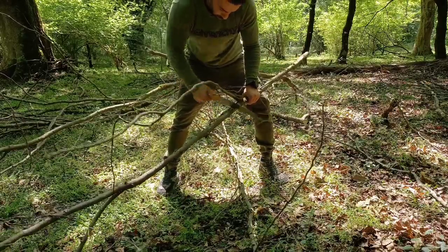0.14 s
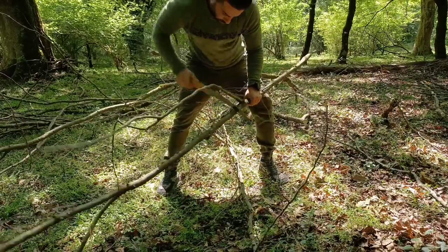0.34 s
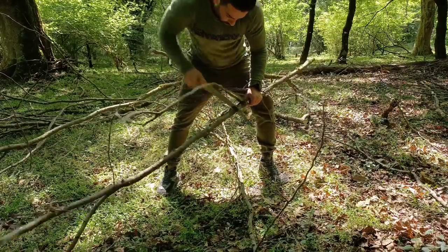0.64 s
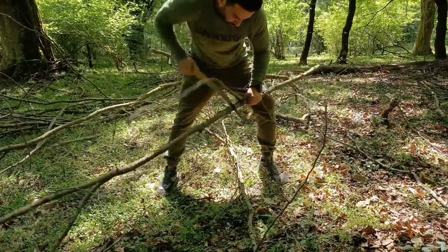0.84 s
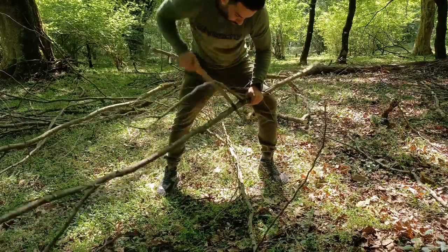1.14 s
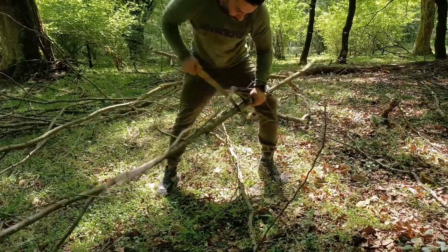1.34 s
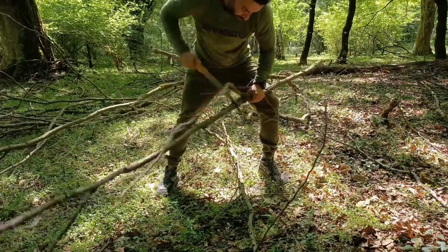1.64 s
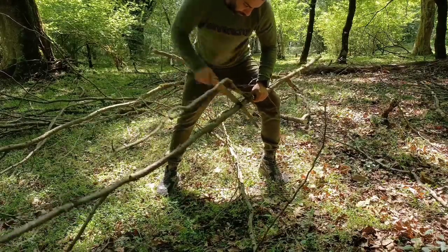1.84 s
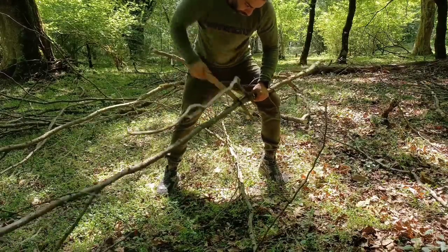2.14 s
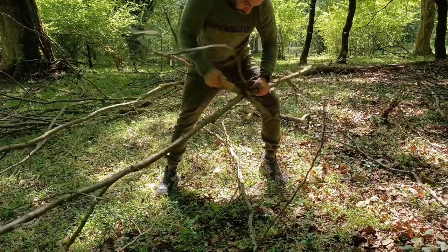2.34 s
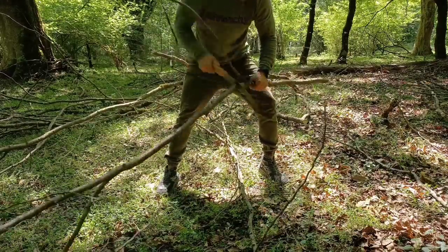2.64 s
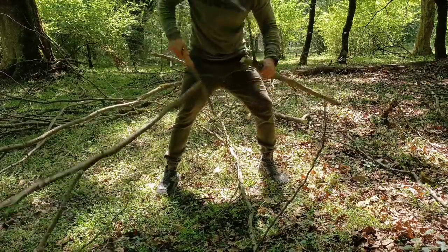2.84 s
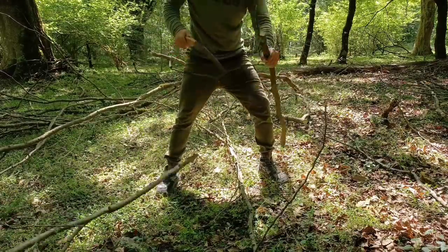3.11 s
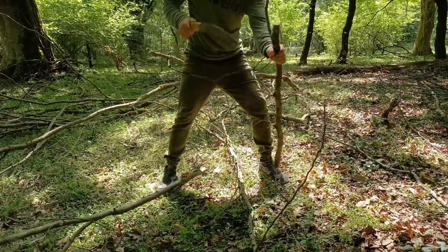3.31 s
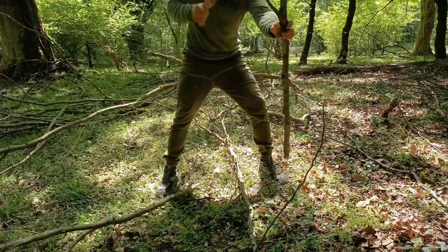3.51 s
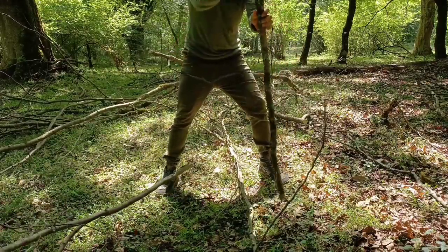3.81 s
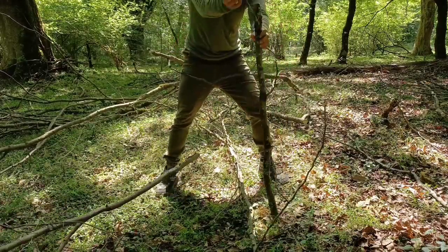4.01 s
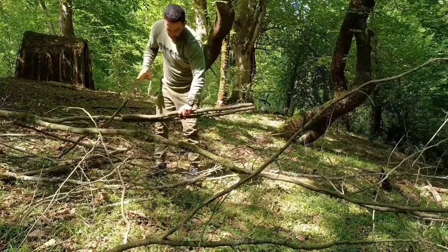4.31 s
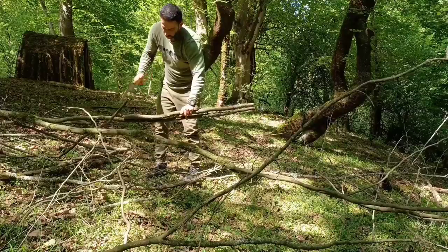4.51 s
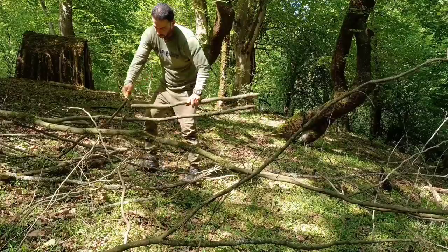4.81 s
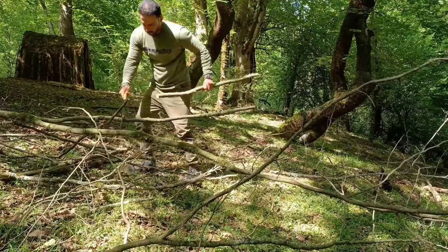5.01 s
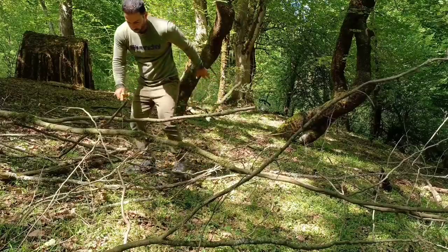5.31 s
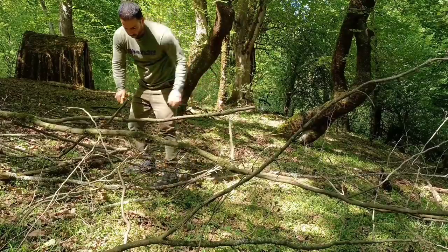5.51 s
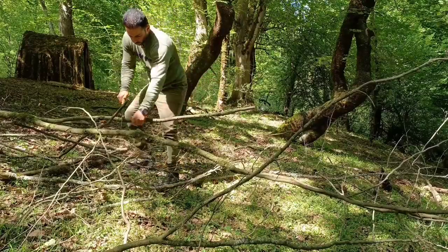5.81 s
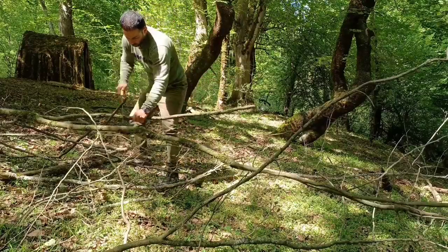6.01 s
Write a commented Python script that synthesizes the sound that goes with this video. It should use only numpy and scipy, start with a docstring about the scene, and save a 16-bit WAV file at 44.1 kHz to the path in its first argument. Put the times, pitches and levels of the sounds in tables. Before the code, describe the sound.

Rapid hand-saw rasps through dry wood, fibres splintering and leaf litter crackling, then knocks of dropped branches, a still pause, and one loud stick clatter.

```python
"""A man saws a dry branch on a forest floor: each stroke is a spray of fibre clicks that follows blade speed,
while twigs shake in dead leaves (clustered clicks), fibres snap (noise bursts) and soil thuds (resonant noise).
It cracks through; the branch is dragged and dropped, and sticks clack together (struck wood modes).
Small birds whistle far off (gliding sines), he steps through the litter and throws a stick on a pile.
Tree echoes (decaying noise) and still forest air (coloured noise) run throughout."""
import sys
import numpy as np
from scipy import signal
from scipy.fft import rfft, irfft
from scipy.io import wavfile
from scipy.ndimage import map_coordinates

SR = 44100
rng = np.random.default_rng(int(sys.argv[2]) if len(sys.argv) > 2 else 0)


def generate_wav(signal):
    """Clip the signal to [-1, 1] and save it as 16-bit WAV at the path in sys.argv[1]."""
    frames = np.transpose(np.atleast_2d(signal))
    scaled = np.clip(frames, -1, 1) * 32767
    pcm = np.round(scaled).astype(np.int16)
    wavfile.write(sys.argv[1], SR, pcm)


N = 271215
TIME_S = np.arange(N) / SR

# Event levels are relative between events of one table.
# saw strokes, pull and push in turn: (start [s], length [s], share of length at top speed [0-1], force [dB],
# ring of blade and wood [Hz], leaf shake re force [dB], branch judder re force [dB])
STROKES = [(0.019, 0.13, 0.72, -42.5, 1280, -5, -12), (0.158, 0.14, 0.57, -38, 2590, -13, -20),
           (0.34, 0.12, 0.34, -39.5, 2300, 2, -8.5), (0.459, 0.18, 0.32, -36.5, 2480, -2, -20.5),
           (0.604, 0.12, 0.38, -38.5, 3000, 0, -9.5), (0.737, 0.17, 0.23, -37, 2400, -2.5, -22),
           (0.892, 0.083, 0.64, -34.5, 1990, 2, -11), (1.003, 0.19, 0.29, -37, 3200, -2.5, -17.5),
           (1.121, 0.12, 0.74, -40, 1430, 4.5, -10), (1.278, 0.11, 0.44, -34, 3300, -3, -21),
           (1.428, 0.12, 0.29, -34.5, 2350, -1.5, -12), (1.547, 0.13, 0.25, -35.5, 3520, -6.5, -24),
           (1.699, 0.13, 0.34, -36, 4300, 0, -19), (1.829, 0.17, 0.27, -39, 1590, -2, -20.5),
           (1.969, 0.13, 0.34, -33.5, 2480, -2, -14.5), (2.09, 0.11, 0.41, -33.5, 3420, -11, -21.5),
           (2.253, 0.088, 0.69, -33, 4450, -0.5, -22.5), (2.386, 0.14, 0.29, -37.5, 1670, -7.5, -18)]
# steps and sweeps of a branch through leaves: (loudest [s], length [s], crackle [dB], crunch re crackle [dB])
RUSTLES = [(0.327, 0.084, -40, -4.5), (2.604, 0.08, -42.5, -5), (2.739, 0.061, -40.5, -1.5),
           (2.918, 0.11, -36.5, -6), (3.058, 0.092, -39, -6.5), (3.224, 0.15, -38.5, -7.5),
           (3.321, 0.059, -41.5, -10), (3.419, 0.034, -34.5, -13), (3.466, 0.056, -38, -10.5),
           (3.944, 0.06, -44, -8.5), (4.763, 0.13, -55.5, -34), (4.903, 0.065, -51, -9),
           (5.074, 0.059, -55, -9), (5.5, 0.065, -51.5, -1.5), (5.621, 0.14, -43.5, -4),
           (5.833, 0.12, -44.5, -12.5), (5.977, 0.11, -49.5, -2), (6.135, 0.06, -53, -2.5)]
# litter stirring under the sawn and dragged branch: (time [s], crackle [dB])
DRAGGING = [(0, -55.5), (.45, -53.5), (.65, -45.5), (1.2, -37.5), (2.1, -39.5), (2.37, -43.5),
            (2.67, -50.5), (3.15, -45.5), (3.68, -57.5), (3.87, -64), (4.02, -58), (4.2, -72.5), (4.3, -87)]
# litter stirring under his feet: (time [s], crackle [dB])
WALKING = [(4.56, -80), (4.61, -69), (4.98, -61), (5.2, -63), (5.38, -73), (5.45, -55.5), (6.15, -62)]
# twigs and wood fibres snapping: (time [s], level [dB], woody crack re treble [dB], ring [Hz])
SNAPS = [(0.5425, -30, 13.5, 3020), (0.602, -25.5, 7, 5250), (0.824, -16.5, -2, 6170),
         (0.885, -16, -2.5, 5700), (1.174, -11.5, -6.5, 5360), (1.5612, -24.5, 3.5, 3730),
         (1.576, -23, 6, 3900), (1.679, -23.5, 0.5, 2960), (1.724, -21, 0.5, 4270), (2.14, -30.5, 16, 3450),
         (2.166, -22, 8.5, 2920), (2.2005, -23.5, 0.5, 3800), (2.2429, -19, 0, 5600),
         (2.412, -23.5, 4, 4870), (2.4281, -17.5, 6.5, 2100), (2.442, -24, 7.5, 5500),
         (2.465, -18.5, -2.5, 5510), (2.485, -20, 9, 1600), (2.742, -23.5, 2, 3540),
         (2.8219, -32, 5.5, 4320), (2.923, -30, 5, 3000), (3.165, -23.5, -5, 4000),
         (3.222, -24.5, -2, 5300), (3.377, -35.5, 5.5, 4560), (3.747, -40, -4.5, 5300), (4.0, -38, 0, 2190),
         (5.545, -39, 4, 5000), (5.5915, -33, 10, 2250), (5.814, -40, 1, 6230)]
# feet and wood landing on soft soil: (time [s], level [dB], length [s], thud pitch [Hz])
THUDS = [(0.546, -44, 0.064, 240), (1.11, -44, 0.032, 235), (1.227, -43, 0.074, 222),
         (3.226, -39.5, 0.042, 158), (3.929, -53, 0.031, 177), (4.725, -57.5, 0.072, 367),
         (5.539, -53, 0.049, 260), (5.577, -41, 0.041, 400), (5.594, -38.5, 0.055, 203),
         (5.799, -53.5, 0.069, 234), (5.942, -54, 0.11, 694), (5.964, -59, 0.092, 138),
         (6.084, -60, 0.16, 268)]
# light sticks knocking: (time [s], level [dB], contact hardness as treble cutoff [Hz])
CLACKS = [(2.486, -22, 1800), (2.741, -22, 2000), (3.6195, -27, 2200), (3.6215, -18.5, 5530),
          (3.627, -37, 3500), (3.641, -35, 2500), (3.828, -39.5, 1300)]
# thick branches knocking: (time [s], level [dB], contact hardness as treble cutoff [Hz])
KNOCKS = [(2.919, -18, 2580), (3.121, -26.5, 1510), (3.169, -23.5, 1020), (5.448, -34, 1300),
          (5.5798, -12.5, 1700), (5.582, -12.5, 1400), (5.5885, -16.5, 1700), (5.604, -20, 600),
          (5.787, -30, 1780), (5.812, -27.5, 750), (6.14, -33, 1100)]
# brittle leaves breaking: (time [s], level [dB])
LEAF_BREAKS = [(3.0245, -21), (3.3255, -23.5), (3.41, -27), (3.465, -29), (3.904, -41), (3.934, -28.5),
               (4.381, -63.5), (4.606, -55.5), (4.805, -41), (4.8933, -37.5), (5.356, -58), (5.424, -48)]
# bird whistles: (start [s], length [s], first pitch [Hz], last pitch [Hz], level [dB])
WHISTLES = [(4.471, .045, 4600, 4190, -79.5), (4.506, 0.078, 4050, 3410, -72),
            (4.54, 0.11, 4500, 3950, -73.5), (4.568, 0.057, 3390, 3310, -64),
            (4.667, 0.13, 3250, 3490, -70), (5.124, .045, 3230, 3055, -61.5), (5.24, .035, 4300, 4100, -77),
            (5.293, 0.037, 3760, 3900, -72.5), (5.29, 0.11, 2340, 2270, -73)]

# modes of a light stick: (frequency [Hz], level [dB], t60 [s])
STICK_MODES = [(1050, -10.5, 0.098), (1204, -4, 0.14), (1360, -4, .09), (1560, -1.5, 0.1), (2010, 6, 0.081),
               (2220, 1.5, .055), (2440, -1, .09), (2830, 1, 0.08), (3300, -2, .07), (4660, -3.5, .05)]
# modes of a thick branch: (frequency [Hz], level [dB], t60 [s])
BRANCH_MODES = [(222, -6, 0.17), (383, -10, 0.057), (495, -4, 0.056), (672, -4, 0.13), (1004, 7, 0.064),
                (1194, -1, .06), (1315, 2, .11), (1450, 4.5, .06), (2250, -3, .06), (2640, 3, 0.083),
                (3440, 10, .04)]
# resonances of blade and wood under the teeth: (frequency [Hz], width [Hz], boost [dB])
CUT_RESONANCES = [(588, 135, 17), (1480, 300, 3), (2200, 67, 6), (5460, 300, 2.5)]

# spectrum of teeth on wood: (frequency [Hz], relative density [dB])
RASP_SPECTRUM = [(100, -38.5), (300, -18.5), (600, -19.5), (850, -7.5), (1300, -2.5), (2500, -0.5),
                 (3800, 1), (6000, 0.5), (8500, -7.5), (10500, -1), (12800, 5), (16000, -5.5)]
# spectrum of tough fibres catching: (frequency [Hz], relative density [dB])
CATCH_SPECTRUM = [(200, -6), (2500, -1), (16000, -12.5)]
# spectrum of the juddering branch: (frequency [Hz], relative density [dB])
JUDDER_SPECTRUM = [(25, -41), (60, -37.5), (110, -4.5), (160, -9), (225, 9), (300, 1), (500, 1), (900, -7),
                   (2500, -39.5)]
# spectrum of crisp leaves, also the treble of snaps: (frequency [Hz], relative density [dB])
CRACKLE_SPECTRUM = [(100, -69.5), (600, -24), (2000, -17.5), (3500, -3.5), (5200, 0.5), (7000, -2),
                    (8600, -5), (10500, 1), (12700, 6.5), (14500, 4.5), (16000, -2.5)]
# spectrum of stalks and moss: (frequency [Hz], relative density [dB])
CRUNCH_SPECTRUM = [(25, -41), (90, -16), (200, -7.5), (380, -3.5), (750, 2), (1500, 3.5), (3000, 3.5),
                   (5000, 1), (9000, -5), (16000, -41.5)]
# spectrum of woody cracks: (frequency [Hz], relative density [dB])
WOODY_SPECTRUM = [(40, -54.5), (300, -37.5), (900, -7.5), (2000, -5.5), (5000, -2.5), (8000, -9.5),
                  (16000, -17.5)]
# response of soft soil: (frequency [Hz], gain [dB])
SOIL_RESPONSE = [(25, -20), (140, -9.5), (700, -3), (4000, -12)]
# spectrum of the tree echo: (frequency [Hz], relative density [dB])
ECHO_SPECTRUM = [(100, 1.0), (1500, -5.5), (4000, 3.0), (16000, -14.5)]
# spectrum of still forest air: (frequency [Hz], relative density [dB])
AIR_SPECTRUM = [(25, -22.5), (120, 3), (200, -1.5), (700, -6), (1100, -12.5), (2700, -18.5), (7000, -17.5),
                (16000, -21)]


def undb(db):
    """Decibels to gain."""
    return 10 ** (np.asarray(db) / 20)


def unit(x):
    """Scale to rms 1."""
    return x / np.sqrt(np.mean(x ** 2))


def add(out, start_s, sound):
    """Mix a short sound in at start_s."""
    i = int(start_s * SR)
    out[..., i:i + sound.shape[-1]] += sound[..., :N - i]


def colour(x, points, peaks=(), keep_power=True, size=4096):
    """Minimum-phase filter through (Hz, dB) points plus resonances."""
    hz = np.arange(size // 2 + 1) * SR / size
    points_hz, points_db = np.transpose(points)
    db = np.interp(np.log(hz + 1), np.log(points_hz), points_db)
    for peak_hz, width_hz, boost_db in peaks:
        db += boost_db / (1 + (2 * (hz - peak_hz) / width_hz) ** 2)
    # folding the cepstrum makes the filter causal
    cepstrum = irfft(np.log(undb(db)))
    cepstrum[1:size // 2] *= 2
    cepstrum[size // 2 + 1:] = 0
    response = irfft(np.exp(rfft(cepstrum)))[:size // 2]
    if keep_power:
        response = response / np.linalg.norm(response)
    return signal.fftconvolve(x, response[None], axes=1)[:, :x.shape[1]]


def resonate(x, hz, q):
    """One resonance, gain 1 at its centre."""
    return signal.lfilter(*signal.iirpeak(hz, q, fs=SR), x)


def walk(rate_hz):
    """Random curve of rms 1 through rate_hz new values a second."""
    return unit(np.interp(TIME_S * rate_hz, np.arange(N), rng.standard_normal(N)))


def noise(width, size=N):
    """Stereo noise; width scales the part that differs between the ears."""
    mid, side = rng.standard_normal((2, size))
    return np.array([mid + width * side, mid - width * side])


def grains(rate_hz, spread_db, lag_ms, scatter_ms, pan_db):
    """Random clicks; each comes from its own direction, so reaches the right ear at its own lag."""
    chance = np.clip(rate_hz / SR, 1e-4, 1)
    size_db = spread_db * np.clip(rng.standard_normal(N), -2.5, 2.5)
    size = unit(undb(size_db)) * rng.choice([-1, 1], N)
    # sparser clicks are larger: mean power stays 1
    clicks = (rng.random(N) < chance) * size / np.sqrt(chance)
    lag_ms = lag_ms + scatter_ms * rng.standard_normal(N)
    lag = np.round(lag_ms * SR / 1000).astype(int)
    right = np.bincount((np.arange(N) + lag) % N, clicks, N)
    return np.array([clicks * undb(pan_db / 2), right * undb(-pan_db / 2)])


def shifting(x, depth_db, rate_hz, per_octave, size=512):
    """Different leaves or parts of the wood sound by turns, so narrow resonances come and go."""
    hz, frame_s, frames = signal.stft(x, SR, nperseg=size)
    place = np.meshgrid(np.log2(1 + hz / 300) * per_octave, frame_s * rate_hz, indexing="ij")
    field = map_coordinates(rng.standard_normal((256, 256)), place, order=3, mode="mirror")
    depth = depth_db / (1 + hz / 12000)
    gain = undb(depth[:, None] * field)
    gain /= np.sqrt(np.mean(gain ** 2, axis=1, keepdims=True))
    return signal.istft(frames * gain, SR, nperseg=size)[1][:, :N]


def forest_air(level_db=-79.5):
    """Still air: coloured noise whose level wanders slowly."""
    return colour(noise(0.81) * undb(walk(0.91)), AIR_SPECTRUM) * undb(level_db)


def blade_speed(length_s, fastest_share, grip_speed=0.6, skate_db=-1.5):
    """The blade skates from rest, grips at a share of top speed, peaks, and stops again."""
    share = np.clip(fastest_share, .1, .9)
    t = TIME_S[:int(length_s * SR)]
    speed = np.sin(np.pi / 2 * np.interp(t, [0, share * length_s, length_s], [0, 1, 0]))
    skating = np.clip((grip_speed - np.maximum.accumulate(speed)) * 20, 0, 1)
    return speed * undb(skate_db * skating)


def stirring(settle_s=0.032, shake_crunch_db=-2, stir_crunch_db=-8.5, rise_share=0.93, fall_share=0.51):
    """Crackle and crunch strength: strokes shake leaves, rustles swell and die, light stirring goes on."""
    force = np.zeros(N)
    for start_s, length_s, fastest, force_db, _, shake_db, _ in STROKES:
        add(force, start_s, undb(force_db + shake_db) * blade_speed(length_s, fastest))
    keep = np.exp(-1 / (settle_s * SR))
    shake = signal.lfilter([1 - keep], [1, -keep], force)
    moves = [(0, shake, shake_crunch_db)]
    t = TIME_S[:SR]
    for loudest_s, length_s, db, crunch_db in RUSTLES:
        rise_s, fall_s = rise_share * length_s, fall_share * length_s
        swell = np.minimum(t / rise_s, np.exp((rise_s - t) / fall_s))
        moves.append((loudest_s - rise_s, undb(db) * swell, crunch_db))
    for curve in DRAGGING, WALKING:
        db = np.interp(TIME_S, *np.transpose(curve), left=-np.inf, right=-np.inf)
        moves.append((0, undb(db), stir_crunch_db))
    power = np.zeros((2, N))
    for start_s, move, crunch_db in moves:
        add(power, start_s, np.array([move, move * undb(crunch_db)]) ** 2)
    return np.sqrt(power)


def leaves(tick_rate_hz=70, tick_db=-9):
    """Dead leaves break in clustered clicks; stalks and moss crunch below, and dry stems tick."""
    crisp, dull = stirring()
    crackle = grains(7000, spread_db=4, lag_ms=.05, scatter_ms=.2, pan_db=-4.2)
    crackle = crackle * undb(1.76 * walk(300))
    ticks = grains(tick_rate_hz, spread_db=0, lag_ms=0.033, scatter_ms=.2, pan_db=2.5) * undb(tick_db)
    crunch = grains(3500, spread_db=-0.5, lag_ms=0, scatter_ms=.2, pan_db=0.5) * undb(2 * walk(120))
    bright = colour((crackle + ticks) * crisp, CRACKLE_SPECTRUM)
    dark = colour((crunch + ticks) * dull, CRUNCH_SPECTRUM)
    return shifting(bright + dark, depth_db=3.5, rate_hz=25, per_octave=7)


def saw(teeth_rate_hz=6000, idle_share=0.034, chatter_db=1.5, swell=1.8, rasp_db=3.5,
        ring_db=-7.5, ring_q=4, catch_rate_hz=220, catch_db=-9.0, judder_lag_s=0.02):
    """Teeth tear fibres faster with speed, chatter and catch on tough ones; the branch judders."""
    motion, rasp, judder = np.zeros(N), np.zeros((2, N)), np.zeros(N)
    for start_s, length_s, fastest, *_ in STROKES:
        add(motion, start_s, blade_speed(length_s, fastest))
    tears = grains(teeth_rate_hz * (motion + idle_share),
                   spread_db=-0.5, lag_ms=0.0048, scatter_ms=.07, pan_db=-1.0)
    catches = grains(catch_rate_hz, spread_db=0.5, lag_ms=0.0034, scatter_ms=0.076, pan_db=-3.7)
    teeth = tears * undb(chatter_db * walk(110)) + undb(catch_db) * colour(catches, CATCH_SPECTRUM)
    for start_s, length_s, fastest, force_db, ring_hz, _, judder_db in STROKES:
        speed = blade_speed(length_s, fastest)
        stroke_teeth = teeth[:, int(start_s * SR):][:, :len(speed)]
        bite = stroke_teeth * undb(force_db + rasp_db) * speed ** swell
        # the blade sits differently in each cut and favours another pitch
        add(rasp, start_s, bite + undb(ring_db) * resonate(bite, ring_hz, ring_q))
        # branch shake trails the blade
        add(judder, start_s + judder_lag_s, undb(force_db + judder_db) * speed)
    bumps = grains(900, spread_db=-3.0, lag_ms=0, scatter_ms=.3, pan_db=1.0)
    cut = colour(rasp, RASP_SPECTRUM, CUT_RESONANCES)
    shake = colour(bumps * judder, JUDDER_SPECTRUM)
    return shifting(cut + shake, depth_db=5, rate_hz=24, per_octave=7.057)


def trees(x, t60_s, size=32768):
    """Trunks and canopy return a diffuse echo, different at each ear."""
    t = TIME_S[:size]
    tail = colour(rng.standard_normal((2, size)), ECHO_SPECTRUM)
    tail *= undb(-60 * t / t60_s) * (1 - np.exp(-t / 0.047))
    return signal.fftconvolve(x, tail / np.linalg.norm(tail[0]), axes=1)[:, :N]


def snaps(lead_s=.008, rise_s=.0015, crack_s=.0006, fall_s=0.0095, snap_db=-10, first_db=5,
          woody_db=-5.0, ring_db=4, ring_q=6.4, pan_db=-0.5, size=2048):
    """A sharp crack, then splintering for milliseconds while the twig rings."""
    bright, woody = np.zeros((2, N)), np.zeros((2, N))
    t = TIME_S[:size] - lead_s
    crack = 1 + undb(first_db) * np.exp(-abs(t) / crack_s)
    # the noise rises briefly ahead of the crack
    envelope = np.where(t < 0, np.exp(-abs(t) / rise_s), crack * np.exp(-abs(t) / fall_s))
    for time_s, db, crack_db, ring_hz in SNAPS:
        burst = noise(0.74, size=size) * envelope
        burst *= undb(db + snap_db) * np.sqrt(fall_s * SR / np.sum(burst ** 2))
        add(bright, time_s - lead_s, burst)
        ringing = burst + undb(ring_db) * resonate(burst, ring_hz, ring_q)
        add(woody, time_s - lead_s, undb(crack_db + woody_db) * ringing)
    both = colour(bright, CRACKLE_SPECTRUM) + colour(woody, WOODY_SPECTRUM)
    return both * undb([[pan_db / 2], [-pan_db / 2]])


def thuds(q=1.0, size=16384):
    """Soil and moss give way under a weight: a dull push that rises fast and fades."""
    out = np.zeros((2, N))
    for time_s, db, length_s, hz in THUDS:
        u = TIME_S[:size] / length_s * 4  # push peaks at a quarter of the length
        rumble = resonate(resonate(noise(0.2, size=size), hz, q), hz, q)
        add(out, time_s, undb(db) * u * np.exp(1 - u) * unit(rumble))
    return colour(out, SOIL_RESPONSE, keep_power=False)


def struck(blows, modes, scatter, scatter_s, width, dense_db, ring_db=-18.5, size=8192):
    """Blows ring wood modes, each in its own mix; twigs and bark clatter, the ground scatters the ring."""
    out, clatter = np.zeros((2, N)), np.zeros((2, N))
    t = TIME_S[:size]
    hz, db, t60_s = np.transpose(modes)[:, :, None]
    for time_s, blow_db, hard_hz in blows:
        detune, mix = rng.standard_normal((2, len(modes), 1))
        gain = undb(db + 2 * mix) / np.sqrt(1 + (hz / hard_hz) ** 4) * rng.choice([-1, 1], hz.shape)
        partials = np.sin(2 * np.pi * hz * (1 + 0.01 * detune) * t) * undb(-60 * t / t60_s)
        ring = np.sum(gain * partials, axis=0) / np.linalg.norm(gain)
        paths = noise(width, size=size) * np.exp(-t / scatter_s)
        soften = signal.butter(2, hard_hz, fs=SR, output="sos")
        add(clatter, time_s, undb(blow_db + dense_db) * signal.sosfilt(soften, paths))
        paths *= scatter / np.linalg.norm(paths[0])
        paths[:, 0] += 1  # direct sound
        add(out, time_s, undb(blow_db + ring_db) * signal.fftconvolve(paths, ring[None], axes=1))
    body = [(hz.min() / 2, -20), *zip(hz[:, 0], db[:, 0]), (hz.max() * 2, -25)]
    # wood radiates little below its lowest mode
    low_cut = signal.butter(2, hz.min() / 2, "high", fs=SR, output="sos")
    return signal.sosfilt(low_cut, out + colour(clatter, body))


def leaf_breaks(fall_s=0.006, click_s=.0006, break_db=-11.5, size=2048):
    """A brittle leaf gives way: a bright click and a short noisy spray."""
    out, t = np.zeros((2, N)), TIME_S[:size]
    envelope = np.exp(-t / fall_s) + 2 * np.exp(-t / click_s)
    for time_s, db in LEAF_BREAKS:
        add(out, time_s, undb(db + break_db) * noise(1, size=size) * envelope)
    return colour(out, CRACKLE_SPECTRUM) * undb([[1], [-1]])  # left of centre


def birds(glide=1.5, swell=1.02, quaver_share=0.0097):
    """Thin quavering whistles that glide quickly at first, swell and fade."""
    out, quaver = np.zeros(N), 1 + quaver_share * walk(250)
    for start_s, length_s, first_hz, last_hz, db in WHISTLES:
        u = np.linspace(0, 1, int(length_s * SR))
        hz = last_hz + (first_hz - last_hz) * (1 - u) ** glide
        hz = hz * quaver[int(start_s * SR):][:len(u)]
        tone = np.sin(2 * np.pi * np.cumsum(hz) / SR)
        add(out, start_s, undb(db) * np.sin(np.pi * u ** swell) * tone)
    return np.array([out, out])


def scene():
    """Work close by, birds far off among echoing trunks, over still forest air."""
    sticks = struck(CLACKS, STICK_MODES, scatter=0.42, scatter_s=0.016, width=0.42, dense_db=-24.0)
    branches = struck(KNOCKS, BRANCH_MODES, scatter=0.16, scatter_s=0.01, width=0.4, dense_db=-19.5)
    near = leaves() + saw() + snaps() + thuds() + sticks + branches + leaf_breaks()
    song = birds()
    near_echo = undb(-19) * trees(near, t60_s=0.48)
    song_echo = undb(-4.5) * trees(song, t60_s=0.2)
    return near + near_echo + undb(-6.5) * song + song_echo + forest_air()


def record(dry, gain_db=1.32, top_hz=15950):
    """A little gain and a steep top cut."""
    top_cut = signal.ellip(12, .1, 70, top_hz, fs=SR, output="sos")
    return signal.sosfilt(top_cut, dry * undb(gain_db))


dry = scene()
out = record(dry)
generate_wav(out)
```